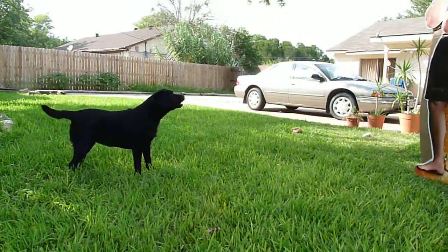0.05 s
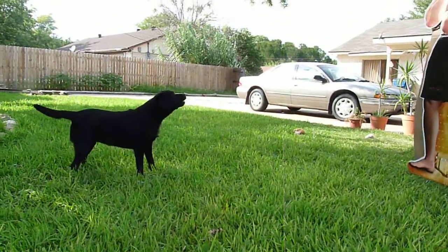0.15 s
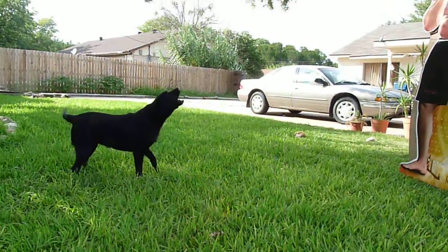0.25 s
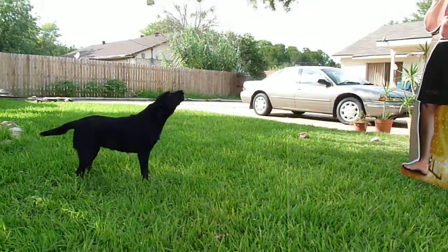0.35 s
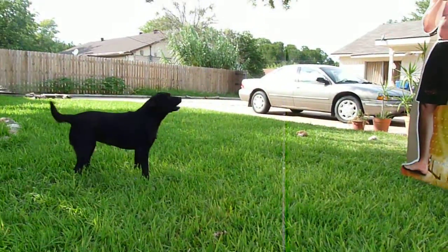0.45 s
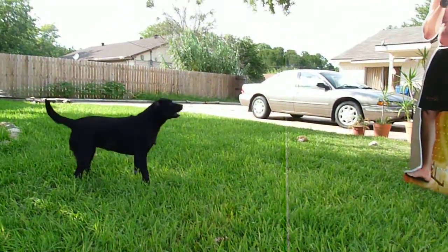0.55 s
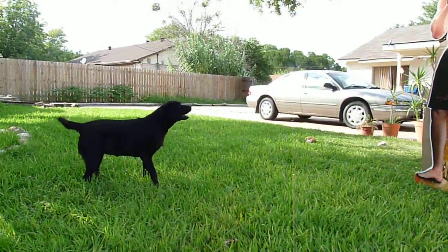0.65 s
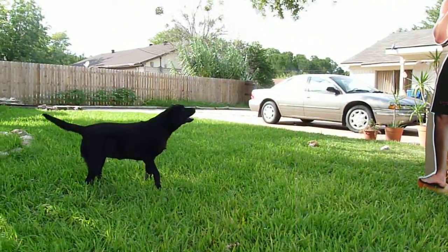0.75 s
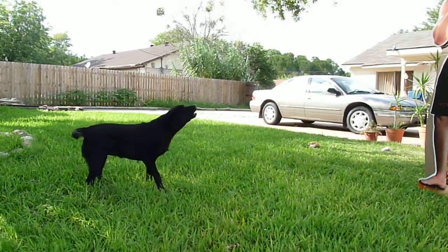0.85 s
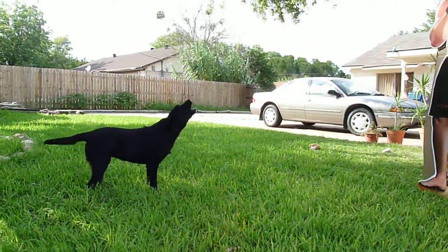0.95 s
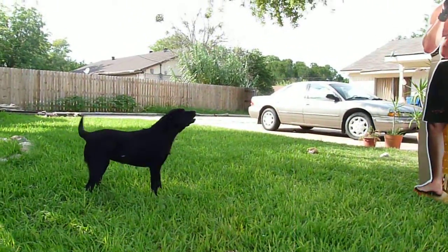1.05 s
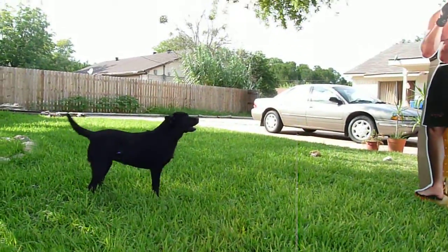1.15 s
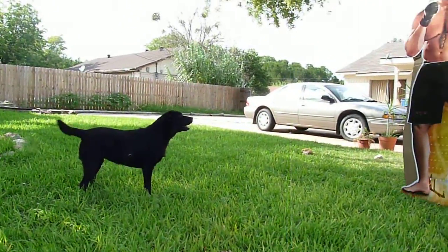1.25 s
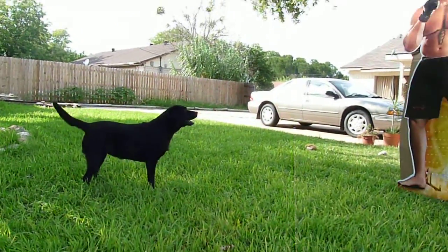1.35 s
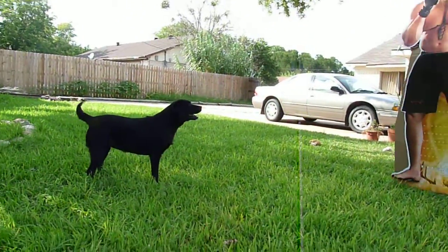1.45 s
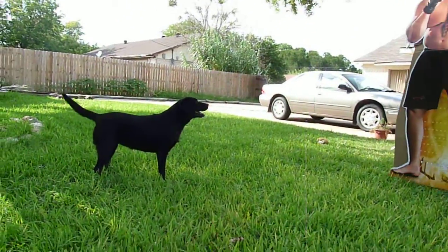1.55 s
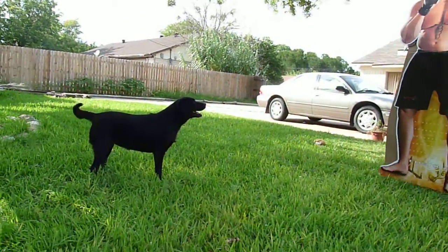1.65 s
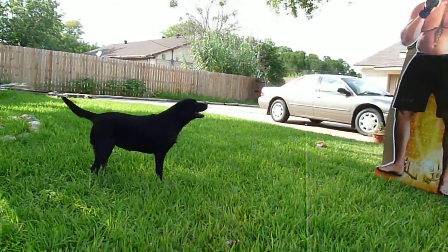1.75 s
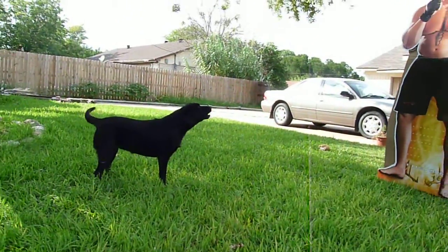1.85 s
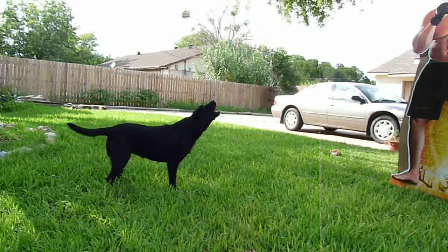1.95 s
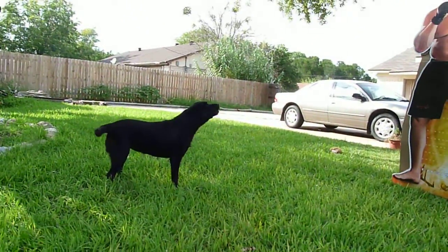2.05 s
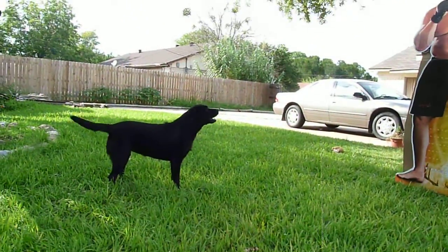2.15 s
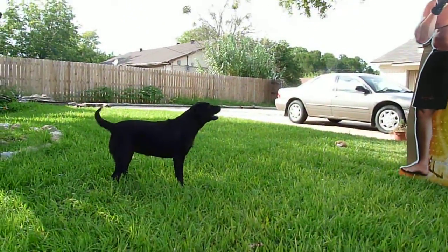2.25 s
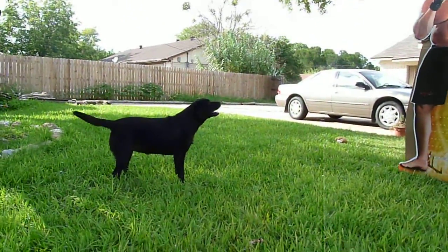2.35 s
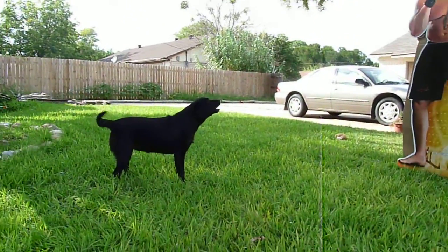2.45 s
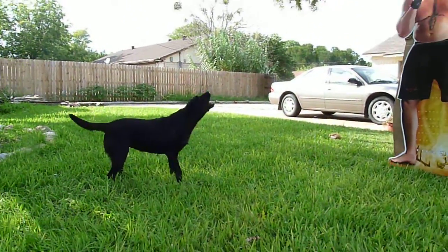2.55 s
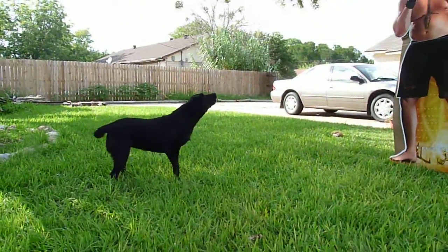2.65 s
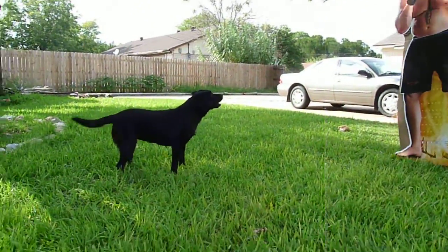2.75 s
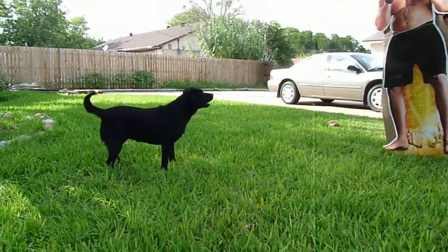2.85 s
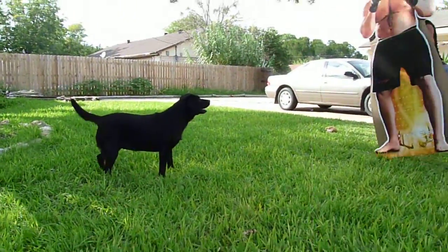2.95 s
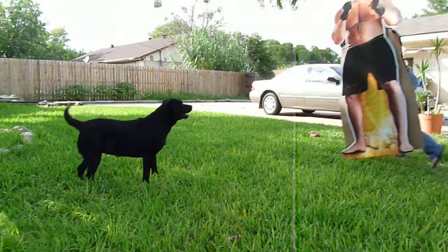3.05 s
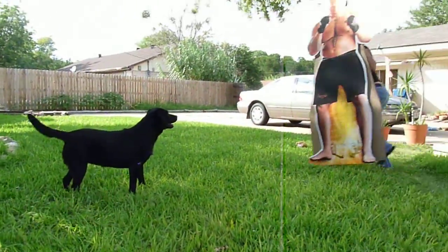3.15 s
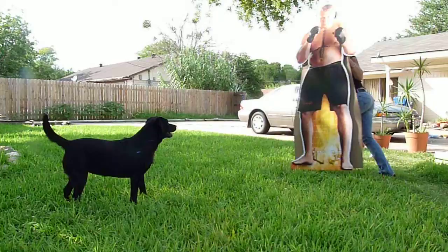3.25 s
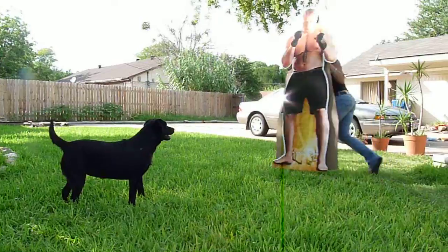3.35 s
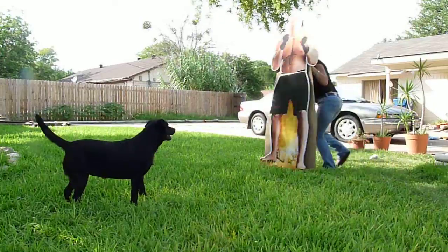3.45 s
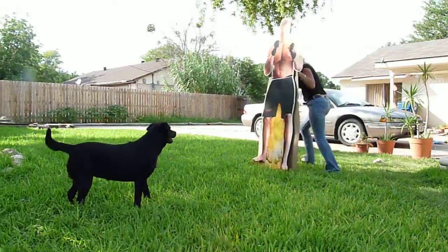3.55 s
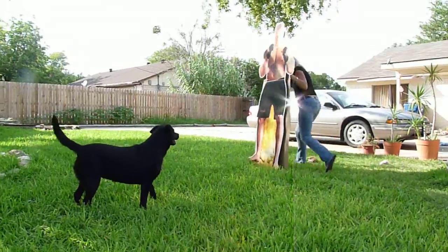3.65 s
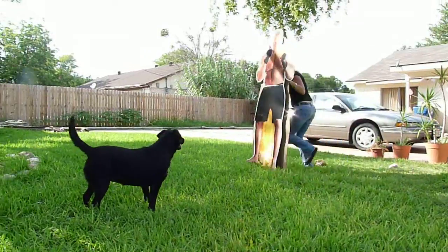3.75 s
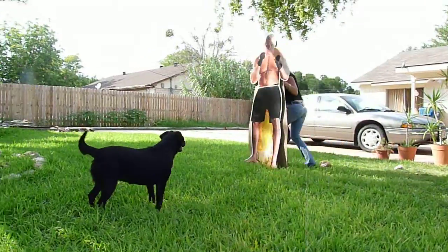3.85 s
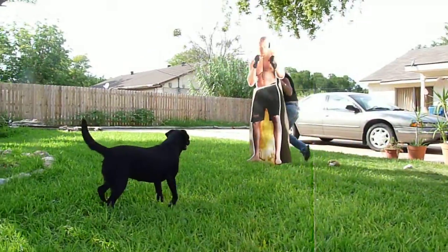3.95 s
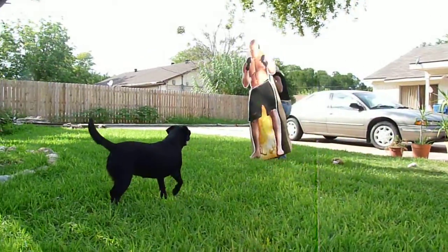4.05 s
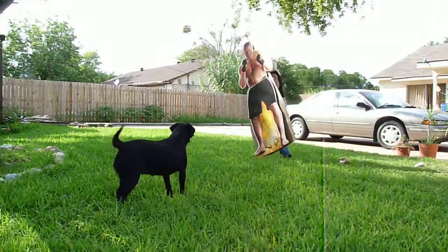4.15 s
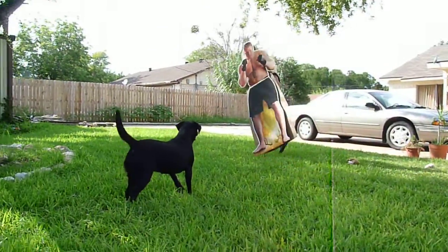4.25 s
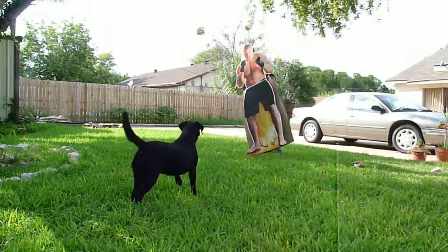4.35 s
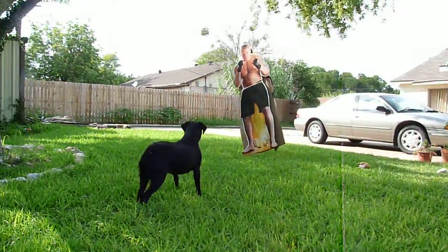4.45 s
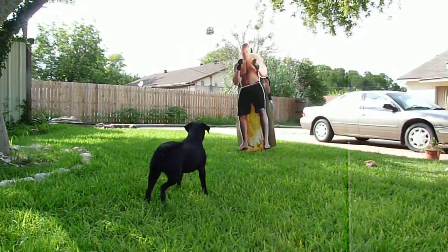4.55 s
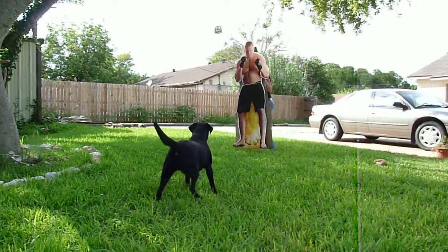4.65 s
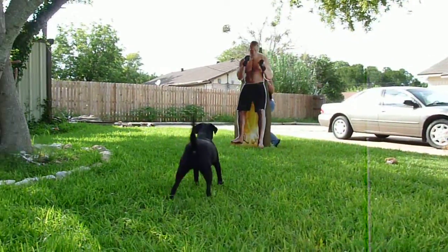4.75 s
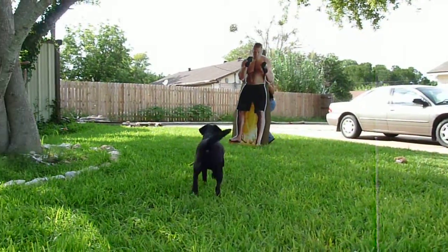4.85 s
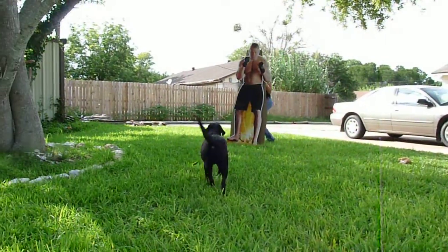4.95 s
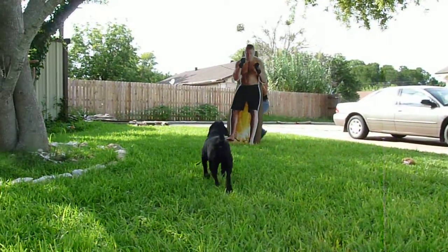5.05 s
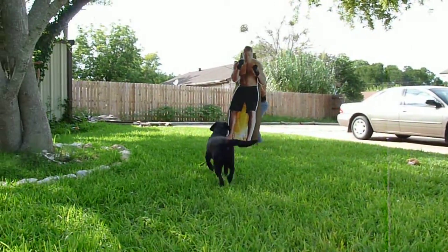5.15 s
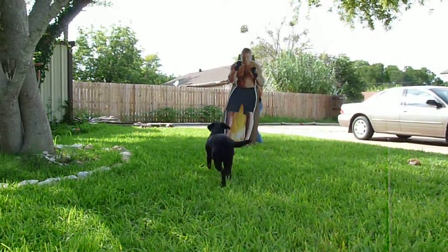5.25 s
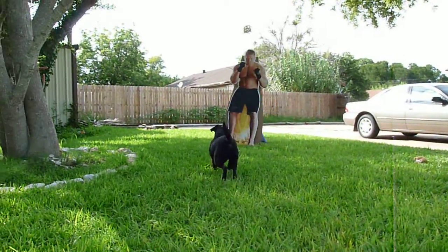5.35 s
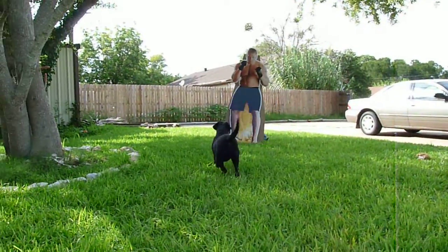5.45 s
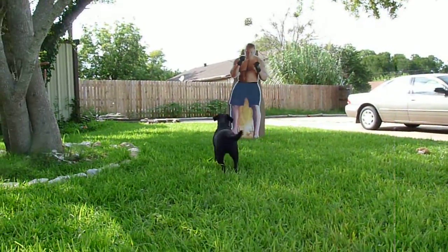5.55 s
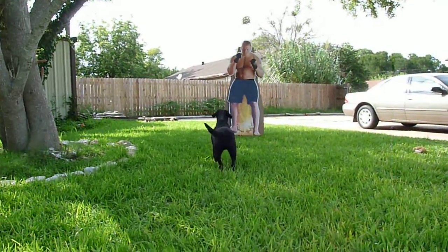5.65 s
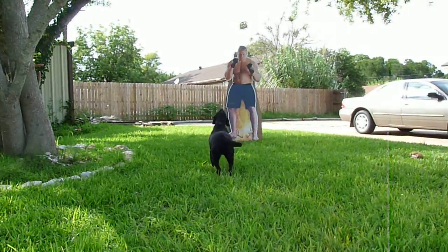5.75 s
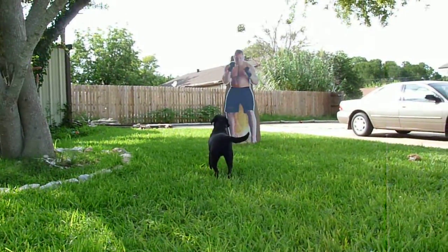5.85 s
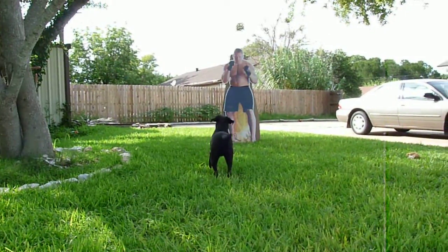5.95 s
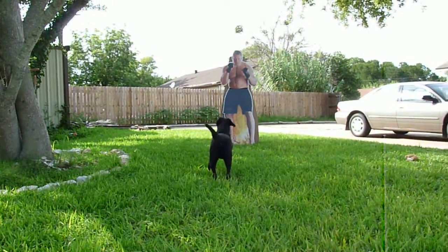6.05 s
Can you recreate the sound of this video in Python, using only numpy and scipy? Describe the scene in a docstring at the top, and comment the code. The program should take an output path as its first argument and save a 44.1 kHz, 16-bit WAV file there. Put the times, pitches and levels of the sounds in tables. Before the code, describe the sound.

A large dog barks four times a few metres away, each bark short, sharp and a little raspy. It pauses for about two seconds, then barks twice more, turned away. A second dog answers faintly from far off, with small jaw clicks and soft bumps on grass in between. Fence and houses give a brief echo over low distant traffic, leaves and a machine hum.

```python
"""A lawn among houses, with a low wash of distant traffic and leaves and the hum of a machine.
A large dog barks six times a few metres away, and another answers from far off. Each bark is a train of
vocal-fold pulses, part tone and part rasp, shaped by the throat and an opening mouth. Jaw clicks and
bumps on the grass fall in between, and fence and houses throw it all back. An automatic gain control
flattens each near bark and ducks the background, which swells back in the pause."""
import sys
import numpy as np
from scipy import signal
from scipy.fft import rfft, irfft
from scipy.io import wavfile
from scipy.ndimage import uniform_filter1d

SR = 44100
rng = np.random.default_rng(int(sys.argv[2]) if len(sys.argv) > 2 else 0)


def transcribe(u):
    """Save the signal u as a 16-bit wav file named by the first command-line argument.

    u: samples, shape (n,) or (channels, n), limited to [-1, 1]; the rate is SR.
    q: integer samples, one column per channel.
    """
    v = np.clip(np.atleast_2d(u).T, -1, 1)
    q = np.round(v * 32767).astype(np.int16)
    wavfile.write(sys.argv[1], SR, q)


N = 269010
TIME = np.arange(N) / SR


def gain_of(db):
    """Decibels to amplitude."""
    return 10 ** (np.asarray(db) / 20)


def unit_rms(x):
    """Scales to rms 1."""
    return x / np.sqrt(np.mean(abs(x) ** 2) + 1e-20)


def curve_at(points, hz):
    """Reads a curve on a log-frequency axis."""
    freqs, values = np.transpose(points)
    return np.interp(np.log(hz + 1), np.log(freqs + 1), values)


def add(mix, start_s, sound):
    """Drops a sound into the mix."""
    part = mix[max(round(start_s * SR), 0):][:len(sound)]
    part += sound[:len(part)]


def drift(rate_hz):
    """Smooth random modulation of rms 1, moving at up to rate_hz."""
    hz = np.fft.rfftfreq(N, 1 / SR)
    return unit_rms(irfft(rfft(rng.standard_normal(N)) / np.sqrt(1 + (hz / rate_hz) ** 8), N))


# Tone of the neighbourhood wash: freq_hz, gain_db
WASH_EQ = [(20, -17.5), (45, -5), (68, 3.5), (95, 2), (150, 3), (250, -1), (400, -6), (850, -5),
           (1200, -11.5), (1700, -19.5), (2400, -27.5), (4000, -41), (8000, -57)]
# Fader moves of the background: time_s, wash_db, hum_db
BACKGROUND_FADERS = [(0, -44, -52.5), (.8, -44, -41.5), (1.7, -40, -39.5), (2.4, -41.5, -54.5),
                     (3.1, -40, -48), (3.7, -40, -41.5), (4.8, -44.5, -43), (5.4, -33.5, -33.5),
                     (6.1, -40, -46.5)]


def background(swell_db=-0.4, hum_hz=124, hum_waver_db=2.0, hum_wander=0.0035):
    """Distant traffic and leaves, with the wavering hum of a machine such as an air conditioner."""
    times, *faders = np.transpose(BACKGROUND_FADERS)
    wash_db, hum_db = (np.interp(TIME, times, fader) for fader in faders)
    wash_eq = gain_of(curve_at(WASH_EQ, np.fft.rfftfreq(N, 1 / SR)))
    wash = unit_rms(irfft(rfft(rng.standard_normal(N)) * wash_eq, N))
    cycles = np.cumsum(hum_hz * (1 + hum_wander * drift(rate_hz=1.3))) / SR
    hum = unit_rms(np.sin(2 * np.pi * cycles)) * gain_of(hum_db + hum_waver_db * drift(rate_hz=3.8))
    return wash * gain_of(wash_db + swell_db * drift(rate_hz=3.0)) + hum


def unsteadiness():
    """The random side of a voice: slips of pitch, uneven beats and rushing air."""
    return np.array([drift(rate_hz=117), drift(rate_hz=170), rng.standard_normal(N)])


def larynx(pitch, rough, unsteady, jitter=0.0692, shimmer=0.65, breath=3.7, waver=0.012,
           rasp=0.72, flutter_ratio=0.68, rolloff=0.11, smear=0.3):
    """Pulses of the vocal folds, uneven and breathy when rough; a slower flutter adds side tones."""
    slip, beat, air = unsteady
    cycles = np.cumsum(pitch * (1 + (waver + jitter * rough) * slip)) / SR
    # the folds close gradually, which smears each pulse over its cycle
    folds = sum(np.exp(-rolloff * k) * np.cos(2 * np.pi * k * cycles - smear * k ** 2)
                for k in np.arange(1, 21))
    flutter = np.cos(2 * np.pi * np.cumsum(pitch * flutter_ratio * (1 + 0.1 * beat)) / SR)
    folds = unit_rms(folds) * np.exp(rough * (shimmer * beat + rasp * flutter))
    puffs = air * (1 + np.cos(2 * np.pi * cycles)) * np.sqrt(SR / pitch / 60)
    return (1 - rough ** 2) * folds + breath * rough ** 1.5 * puffs


def minimum_phase(eq_db):
    """Turns EQ curves (bins x frames) into filters that ring after each pulse."""
    log_gain = np.log(gain_of(np.maximum(eq_db, -90)))
    mirrored = np.concatenate([log_gain, log_gain[-2:0:-1]])
    return np.exp(signal.hilbert(mirrored, axis=0).conj())[:len(eq_db)]


def bark(start_s, gesture, treble_db, bass_db, lawn_dip_hz, throat, unsteady,
         bass_hz=400, treble_hz=1600, bite_hz=1700, bite_db=6, dip_db=5, dip_octaves=0.23):
    """The larynx sounds through throat and mouth, following curves of level, pitch, rasp and opening."""
    level_db, pitch, rough, mouth = gesture
    span = (round(start_s * SR) + np.arange(len(pitch))) % N
    pulses = larynx(pitch, np.clip(rough, 0, 1), unsteady[:, span])
    hz, frame_s, spectra = signal.stft(pulses, SR, nperseg=512, noverlap=448)
    hz = hz[:, None]
    climb = np.clip(np.gradient(pitch) * SR / 3500, 0, 1)  # full at 3500 Hz per second
    opening, fundamental, snap, leak = (np.interp(frame_s, TIME[:len(curve)], curve)
                                        for curve in (mouth, pitch, climb, rough))
    # the resonances drop as the mouth shuts
    eq_db = curve_at(throat, hz / opening ** 0.55)
    # leaky, chaotic folds damp the throat, so its resonances broaden
    eq_db += np.clip(leak, 0, 1) * (uniform_filter1d(eq_db, size=7, axis=0) - eq_db)
    # the folds snap harder while the pitch climbs: a bite in the upper mids
    eq_db += bite_db * snap * np.exp(-2 * np.log2((hz + 1) / bite_hz) ** 2)
    # the bounce off the lawn cancels one band
    eq_db -= dip_db * np.exp(-(np.log2((hz + 1) / lawn_dip_hz) / dip_octaves) ** 2)
    # an open mouth beams its treble forward, while the bass spreads all round
    eq_db += (treble_db - 12 * (1 - opening)) * hz ** 6 / (hz ** 6 + treble_hz ** 6)
    eq_db += bass_db / (1 + (hz / bass_hz) ** 6)
    # a half-shut mouth favours the fundamental; below it the sound falls away
    eq_db += 75 * (1 - opening) ** 2 * np.exp(-((hz / fundamental - 1) / 0.46) ** 2)
    low_cut = 1 / (1 + (0.76 * fundamental / (hz + 1)) ** 12)
    shaped = spectra * minimum_phase(eq_db) * low_cut
    voice = signal.istft(shaped, SR, nperseg=512, noverlap=448)[1][:len(pulses)]
    # level the voice so that level_db alone draws its envelope
    power = uniform_filter1d(uniform_filter1d(voice ** 2, size=380), size=200)
    voice /= np.sqrt(abs(power) + 1e-12)
    return voice * gain_of(level_db) * signal.windows.tukey(len(voice), 0.03)


def near_gesture(attack_s, push_s, release_s, top_db, top_hz, climb_s, top_rough, growl_s, growl_db,
                 growl_hz=135.96, growl_rough=0.81, attack_db=-22.5,
                 swell_s=0.025, open_s=0.018, clear_s=0.028, leap_hz=64.85, leap_s=0.01609,
                 break_s=0.013, break_db=6, flip_hz=79.8, flip_s=0.02195, fade_db=27):
    """A low growl, a push that lifts pitch and level together, a break of the voice, and the fall."""
    t = np.arange(-growl_s, push_s + 2.6 * release_s, 1 / SR)
    since_attack, since_break = np.maximum(t, 0), np.maximum(t - push_s, 0)
    swell = np.clip(1 + t / swell_s, 0, 1)
    climb = 1 - np.exp(-since_attack / climb_s)
    broken = np.clip(1 + (t - push_s) / break_s, 0, 1)
    fall = (since_break / release_s) ** 2
    level_db = growl_db + (attack_db - growl_db) * swell + (top_db - attack_db) * climb
    level_db -= break_db * broken + fade_db * fall
    # the pitch arches, with a leap out of the growl and an upward flip at the break
    pitch = growl_hz + (top_hz - growl_hz) * climb * np.exp(-1.25 * fall)
    pitch += leap_hz * swell * np.exp(-since_attack / leap_s)
    pitch += flip_hz * np.clip(2 * since_break / break_s, 0, 1) * np.exp(-since_break / flip_s)
    # the growl clears, the voice catches at random, then turns rough at the break and half settles
    held_rough = top_rough * np.exp(0.35 * drift(rate_hz=45)[:len(t)])
    rough = held_rough + (growl_rough - held_rough) * np.exp(-(since_attack / clear_s) ** 2)
    break_rough = 0.62 * (1 - 0.5 * np.minimum(since_break / release_s, 1))
    rough = np.clip(rough + (break_rough - rough) * broken, 0, 1)
    # the mouth opens from half shut and closes again over the fall
    mouth = 0.54 + 0.46 * (1 - np.exp(-since_attack / open_s)) * np.exp(-3.2 * fall)
    return attack_s - growl_s, (level_db, pitch, rough, mouth)


# Cues for the near dog: attack_s, push_s, release_s, top_db, top_hz, climb_s, top_rough (0-1),
# growl_s (ahead of the attack), growl_db, treble_db, turned_away (0 or 1)
NEAR_BARKS = [(.267, 0.12, .088, 1, 463.5, 0.036, 0.23, .09, -37, -4.5, 0),
              (.926, 0.096, .095, 2, 472.6, 0.027, 0.45, 0.043, -34.5, -4, 0),
              (1.929, 0.1, 0.094, 3, 469, 0.035, 0.11, 0.049, -31.5, 3, 0),
              (2.568, .102, 0.083, 5, 473.2, .036, 0.05, .045, -32, 3.5, 0),
              (4.979, .113, 0.12, -2, 450.1, .027, 0.31, .013, -53.5, -1.5, 1),
              (5.672, 0.12, 0.093, -1, 448.5, 0.028, 0.23, .066, -26, -4.5, 1)]
# Resonances of its open throat: freq_hz, gain_db
NEAR_THROAT_EQ = [(100, -9), (200, -12.5), (330, -22.5), (450, -24.5), (550, -0.5), (700, -9), (860, 5.5),
                  (1070, -11.5), (1380, -16), (1650, -29), (2050, -31), (2550, -46), (3100, -44),
                  (3600, -59), (5000, -74)]


def near_dog():
    """The large dog, side on or turned away down the lawn: its direct sound and its send to the yard."""
    side_on, facing_away = (-5.5, 1120, -2.2), (6.6, 607, 3.6)
    unsteady, direct, send = unsteadiness(), np.zeros(N), np.zeros(N)
    for *cue, treble_db, turned_away in NEAR_BARKS:
        bass_db, lawn_dip_hz, send_db = facing_away if turned_away else side_on
        start_s, gesture = near_gesture(*cue)
        voice = bark(start_s, gesture, treble_db, bass_db, lawn_dip_hz, NEAR_THROAT_EQ, unsteady)
        add(direct, start_s, voice)
        add(send, start_s, voice * gain_of(send_db))
    return direct, send


# Slaps off wall, fence and houses: delay_s, level_db
YARD_SLAPS = [(.004, -31), (.0125, -10.5), (.031, -21.5), (.052, -16.5), (.108, -26), (.156, -28.5),
              (.215, -36.5)]
# Tone of the diffuse tail: freq_hz, gain_db
TAIL_EQ = [(150, -23.5), (450, -27), (680, -34), (865, -18), (1080, -10.5), (1400, -6), (2000, -7),
           (3200, -7.5)]
# Decay of the tail: freq_hz, t60_s
TAIL_DECAY = [(200, 1), (800, 0.65), (1500, 0.73), (3500, 0.68)]


def yard(send, build_s=0.028, taps_per_s=2000):
    """A few distinct echoes, then scatter from trees and houses, each band dying at its own speed."""
    taps = rng.choice([-1., 1.], SR) * (rng.random(SR) < taps_per_s / SR)
    hz, t, scatter = signal.stft(taps * (1 - np.exp(-TIME[:SR] / build_s)), SR, nperseg=256)
    scatter *= gain_of(-60 * t / curve_at(TAIL_DECAY, hz)[:, None])
    norm = np.linalg.norm(signal.istft(scatter, SR, nperseg=256)[1])
    scatter *= gain_of(curve_at(TAIL_EQ, hz))[:, None]
    response = signal.istft(scatter, SR, nperseg=256)[1] / norm
    for delay_s, level_db in YARD_SLAPS:
        add(response, delay_s, gain_of([level_db]))
    return signal.fftconvolve(send, response)[:N]


# Cues for jaw clicks and bumps on the grass: start_s, level_db, band_hz, t60_s
CLICKS_AND_BUMPS = [(0.892, -42, 1420, .03), (1.878, -33.5, 845, 0.04), (2.523, -32.5, 800, 0.026),
                    (4.317, -36, 298, 0.054), (5.389, -29.5, 295, 0.14), (5.378, -29.5, 740, 0.15)]


def clicks_and_bumps():
    """Small clicks of the jaw and soft bumps on the grass: dull noise bursts that die at once."""
    out, t = np.zeros(N), TIME[:SR // 5]
    for start_s, level_db, band_hz, t60_s in CLICKS_AND_BUMPS:
        band = signal.butter(3, [band_hz * 0.75, band_hz * 1.41], "band", fs=SR, output="sos")
        burst = rng.standard_normal(len(t)) * gain_of(level_db - 60 * t / t60_s)
        add(out, start_s, signal.sosfilt(band, burst) * np.sqrt(SR / band_hz))
    return out


def far_gesture(length_s, top_db, top_hz, mid_rough, top_at=0.4, ends_db=17.5, sag=0.2, fray=0.42):
    """Level, pitch and mouth follow one early-peaking arch while the voice frays."""
    progress = np.arange(0, length_s, 1 / SR) / length_s
    slack = 1 - np.sin(np.pi * progress ** (np.log(0.5) / np.log(top_at)))  # 0 at the top, 1 at the ends
    rough = mid_rough + fray * (progress - 0.5)
    mouth = 1 - 0.06 * slack
    return top_db - ends_db * slack, top_hz * (1 - sag * slack), rough, mouth


# Cues for the far dog: start_s, length_s, top_db, top_hz, mid_rough (0-1), treble_db
FAR_ANSWERS = [(1.215, .18, -26, 352.2, 0.37, -1.5), (2.247, .2, -27.5, 362, 0.31, 0),
               (4.47, .185, -31, 369.3, 0.56, 0.5), (6.025, 0.16, -22.5, 365, 0.43, 0)]
# Resonances of its throat: freq_hz, gain_db
FAR_THROAT_EQ = [(150, -25.5), (350, -16), (500, -16), (620, 4), (720, 10.5), (900, -22), (1220, -9.5),
                 (1600, -25), (1950, -24.5), (2400, -48), (4000, -67)]


def far_dog(bass_db=-1, lawn_dip_hz=400):
    """Four faint answering barks from a second throat far off."""
    unsteady, out = unsteadiness(), np.zeros(N)
    for start_s, *cue, treble_db in FAR_ANSWERS:
        voice = bark(start_s, far_gesture(*cue), treble_db, bass_db, lawn_dip_hz, FAR_THROAT_EQ, unsteady)
        add(out, start_s, voice)
    return out


def scene(far_send_db=3.5):
    """The mono mix: dogs, clicks and bumps, direct and through the yard, over the background."""
    near, near_send = near_dog()
    far, knocks = far_dog(), clicks_and_bumps()
    echoes = yard(near_send + knocks + gain_of(far_send_db) * far)
    return (near + far + knocks + echoes + background())[None]


def gain_control(x, ceiling_db=-17.5, recovery_db_per_s=12, start_db=12):
    """Decibels of ducking: clamps at once on a loud peak and lets go slowly; starts already ducked."""
    peak_db = 10 * np.log10(abs(uniform_filter1d(x ** 2, size=52)) + 1e-12)
    recovery_db = TIME * recovery_db_per_s
    held_db = np.maximum.accumulate(peak_db - ceiling_db + recovery_db)
    duck_db = np.maximum(np.maximum(held_db, start_db) - recovery_db, 0)
    return uniform_filter1d(uniform_filter1d(duck_db, size=50), size=50)


def record(dry, hiss_db=-68, whine_db=-84, whine_hz=6667, thump_db=-53, offset=-0.0058, cutoff_hz=8000):
    """Gain control, whose steps leak a faint thump; amplifier hiss, whine and offset; a high cut."""
    duck_db = gain_control(dry[0])
    thump_band = signal.butter(1, [12, 25], "band", fs=SR, output="sos")
    thump = gain_of(thump_db) * signal.sosfilt(thump_band, duck_db - duck_db[0])
    hiss = gain_of(hiss_db) * rng.standard_normal(N) * np.sqrt(SR / 2 / cutoff_hz)
    whine = gain_of(whine_db) * unit_rms(np.sin(2 * np.pi * whine_hz * TIME))
    mix = dry[0] * gain_of(-duck_db) + thump + hiss + whine
    high_cut = signal.firwin(141, cutoff_hz, window=("kaiser", 8), fs=SR)
    return (signal.oaconvolve(mix, high_cut, "same") + offset)[None]


dry = scene()
out = record(dry)
transcribe(out)
```